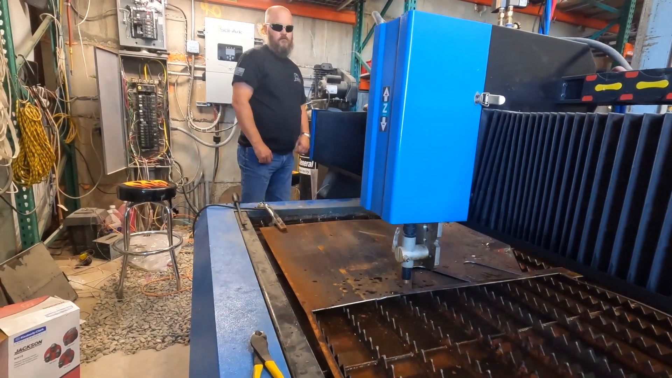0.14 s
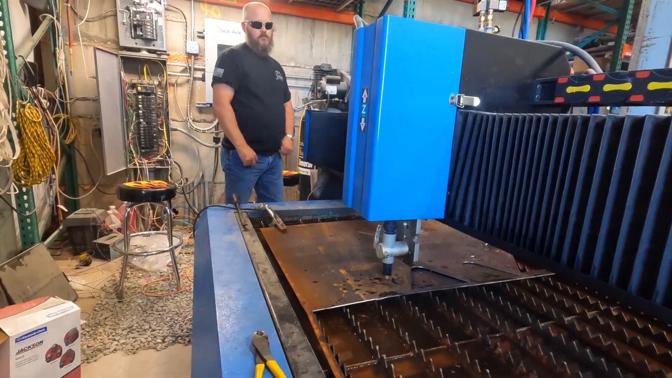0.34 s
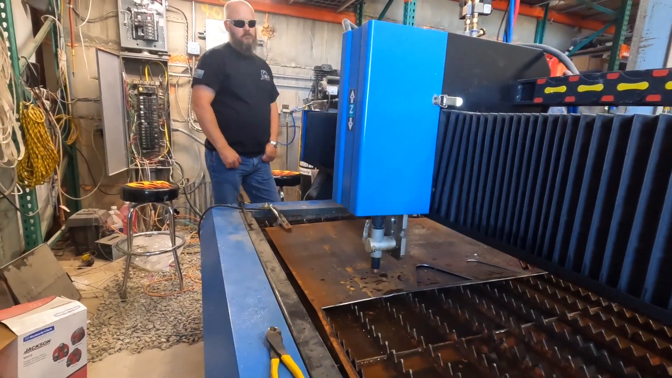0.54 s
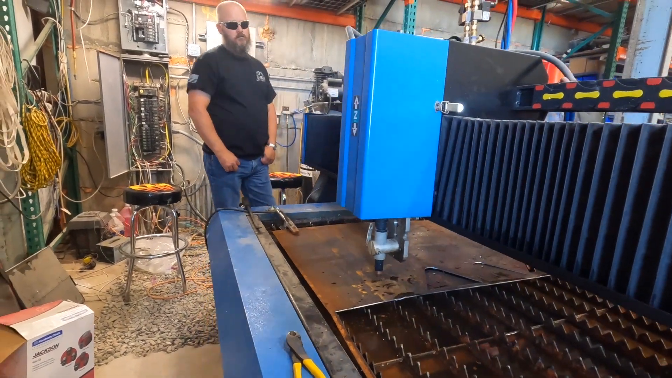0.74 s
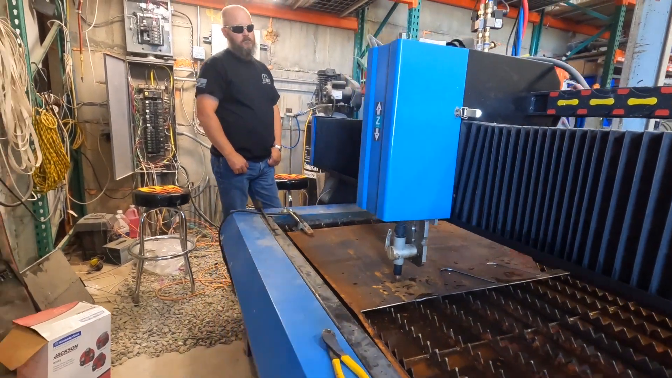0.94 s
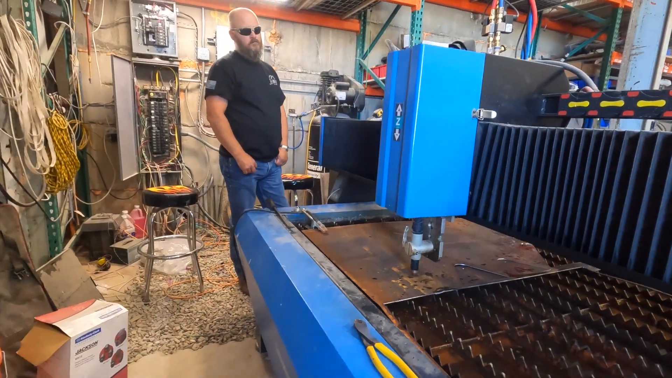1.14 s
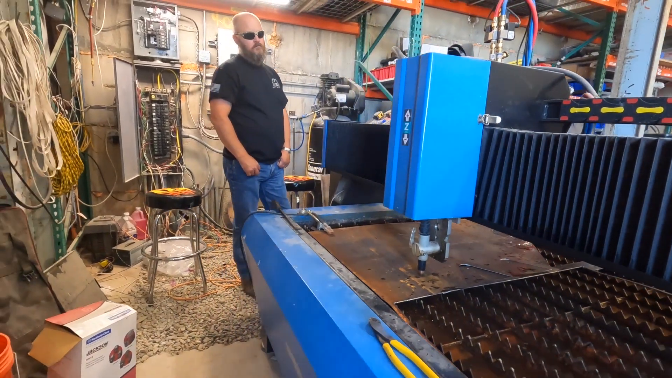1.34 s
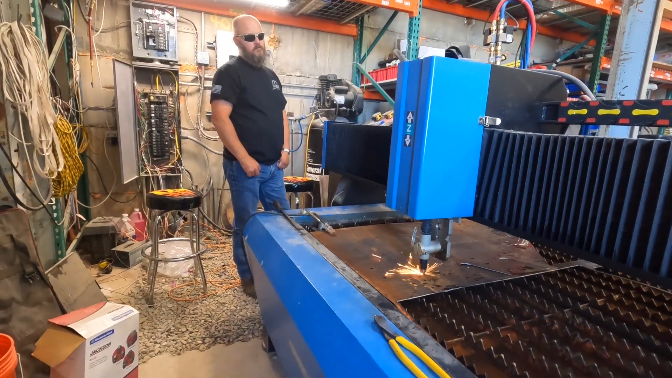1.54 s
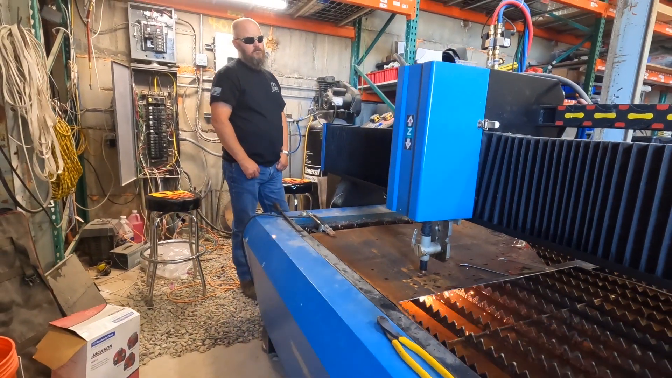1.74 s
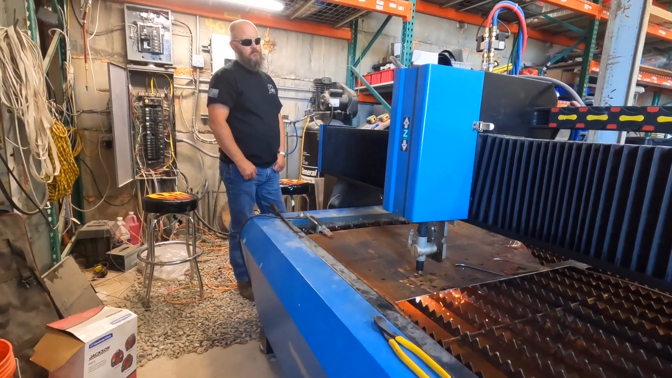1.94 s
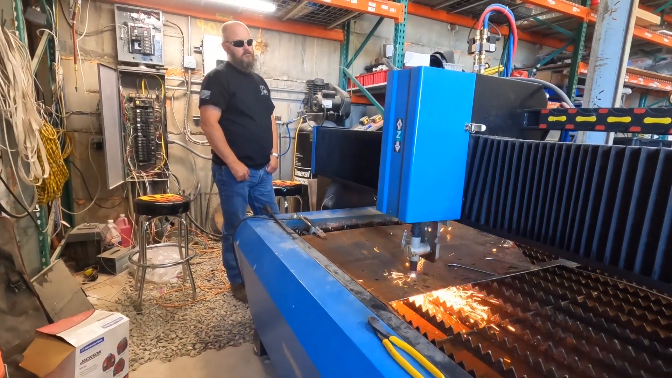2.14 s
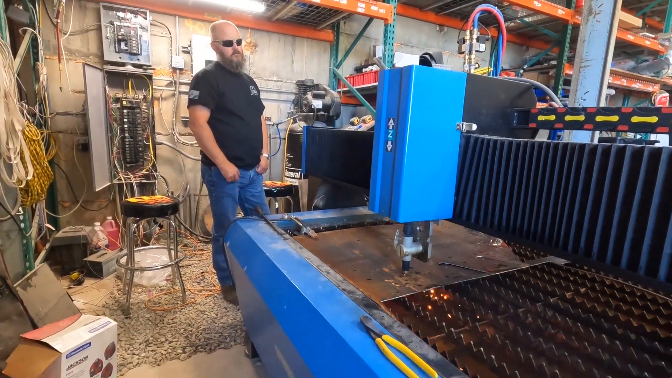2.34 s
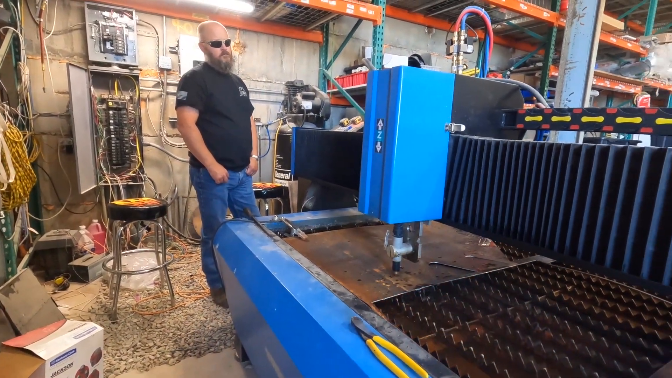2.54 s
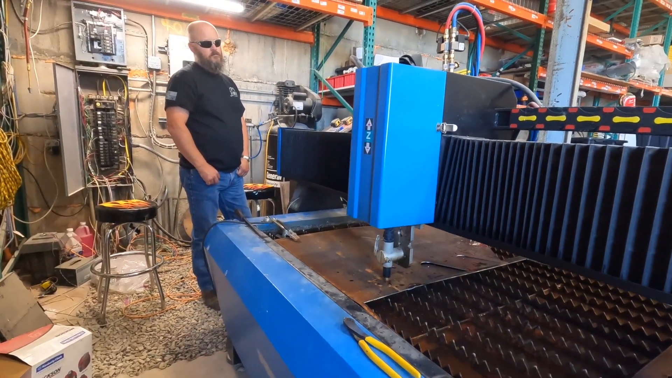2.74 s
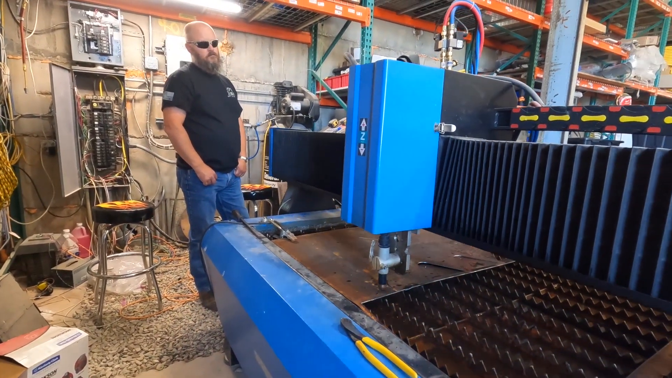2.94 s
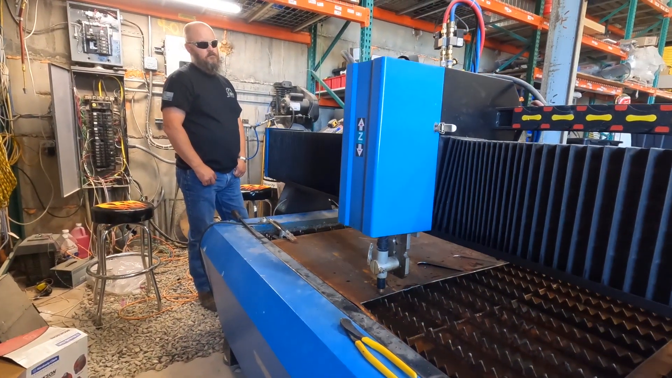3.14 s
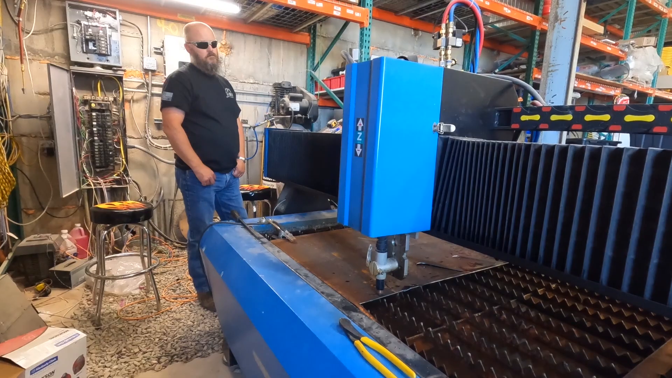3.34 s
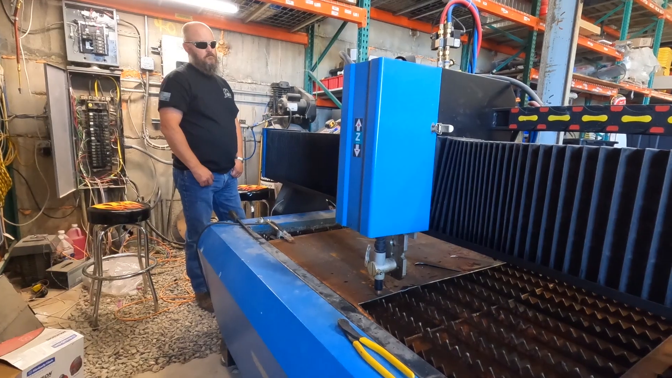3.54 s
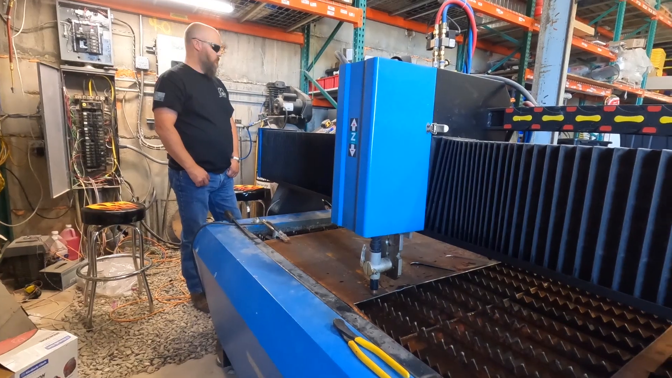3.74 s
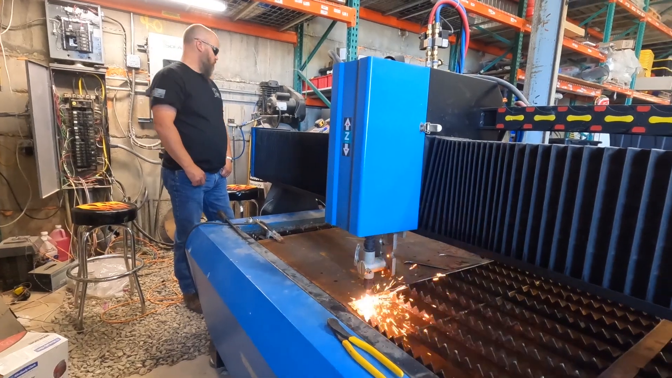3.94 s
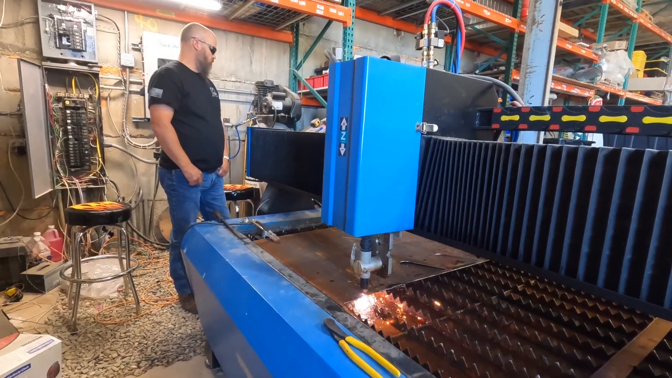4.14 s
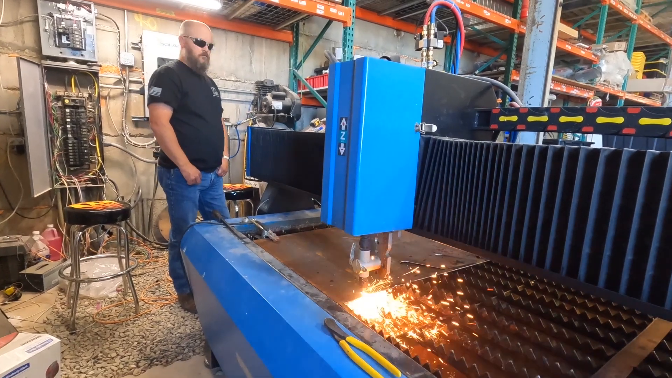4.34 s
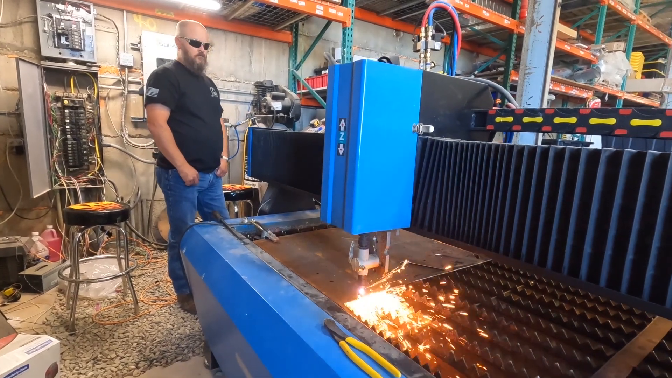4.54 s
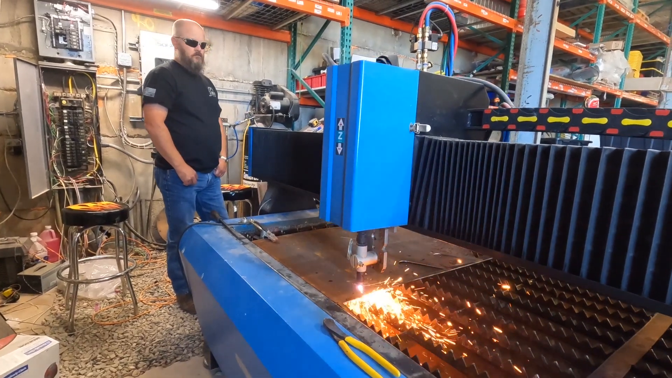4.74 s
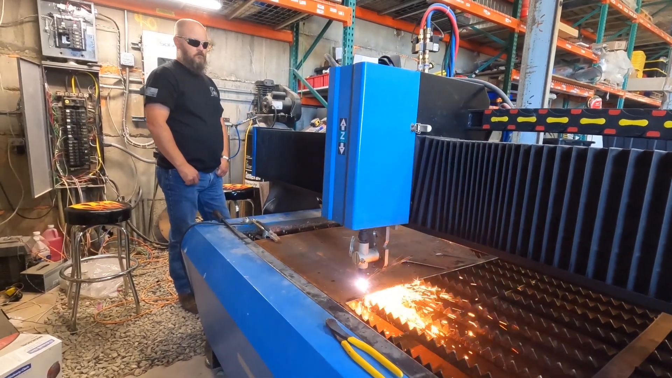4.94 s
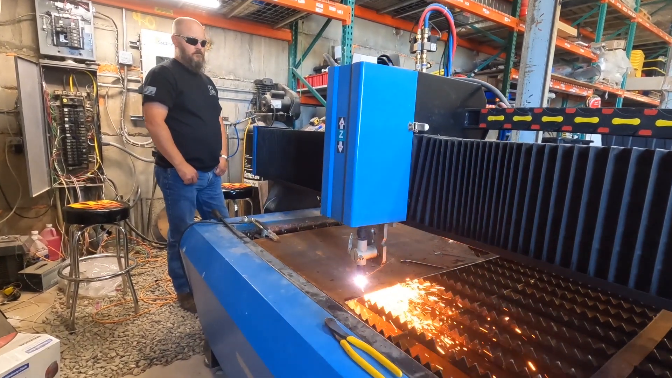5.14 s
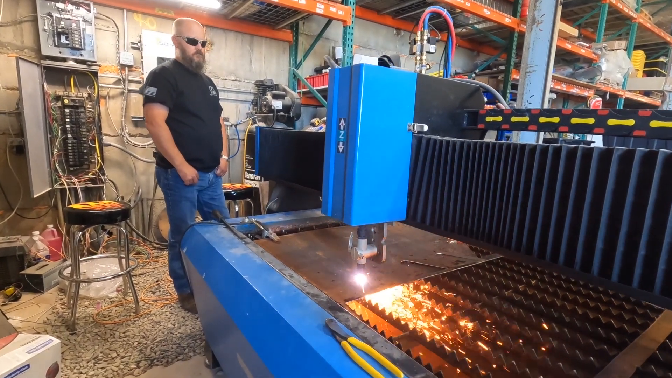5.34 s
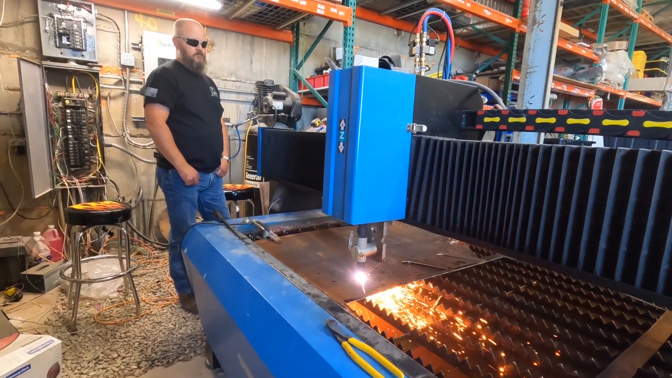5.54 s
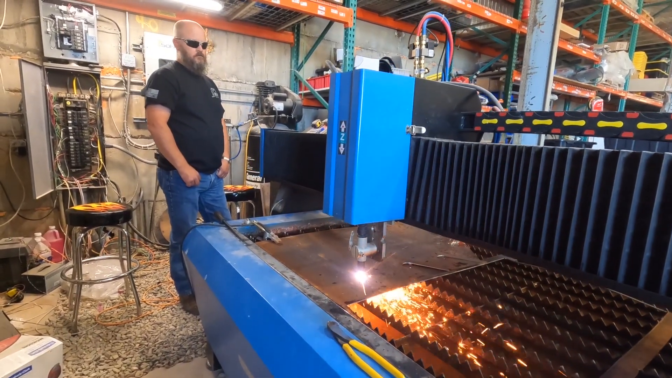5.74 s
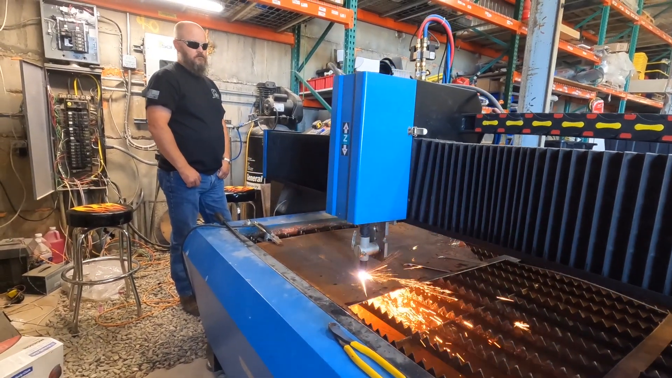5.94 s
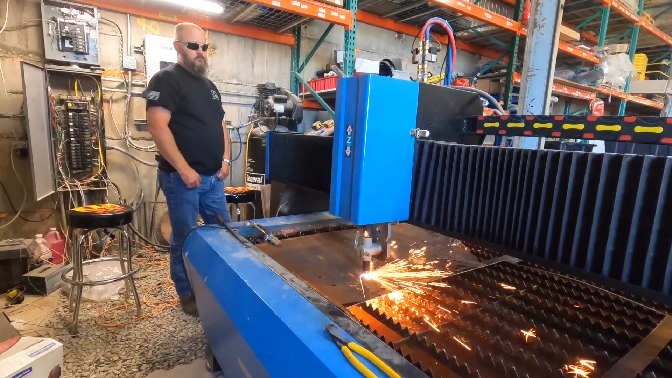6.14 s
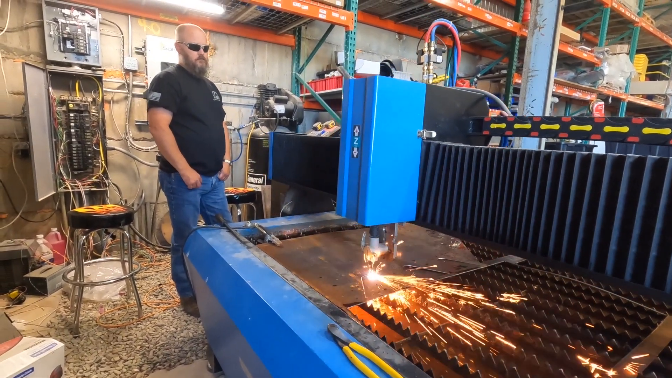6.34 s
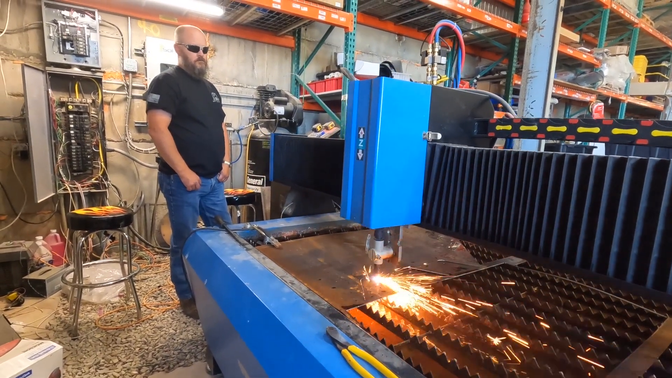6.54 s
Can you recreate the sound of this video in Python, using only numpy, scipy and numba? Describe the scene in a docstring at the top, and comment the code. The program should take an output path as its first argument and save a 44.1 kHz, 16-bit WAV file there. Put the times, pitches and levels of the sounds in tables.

```python
"""Plasma torch on a steel plate

In a workshop, with the microphone close to the cutting table, a CNC plasma torch ends one cut, shuts
off, pierces the plate with a sputtering roar, blows freely through the hole, shuts off again, relights
and runs along a new cut. The air jet hisses, the slot sings in gliding resonances, fans hum behind."""
import sys
import numpy as np
from scipy import signal
from scipy.fft import rfft, irfft, next_fast_len
from scipy.io import wavfile
from scipy.ndimage import uniform_filter1d, map_coordinates
from numba import njit

SR = 44100
rng = np.random.default_rng(int(sys.argv[2]) if len(sys.argv) > 2 else 0)


def wav_record(signal):
    """Record a signal, one row per channel, as 16-bit PCM in the file named by sys.argv[1]."""
    frames = np.transpose(np.atleast_2d(signal))
    bounded = np.clip(frames, -1, 1)
    # unit amplitude maps onto the largest positive 16-bit level
    quanta = np.round(bounded * 32767).astype(np.int16)
    wavfile.write(sys.argv[1], SR, quanta)


N = 290619
TIME, BINS = np.arange(N) / SR, np.fft.rfftfreq(N, 1 / SR)

# blasts from the air valve: (full flow at [s], stays open [s], relative level [dB], bleed-off time [s])
AIR_BLASTS = [(0, 1.239, -51, 0.37), (1.572, 1.982, -33.5, .19), (3.909, 2.68, -31.5, 0.21)]
VALVE_OPEN_S = 0.047
# stages of the work: (start [s], end [s])
FIRST_ARC, PIERCE_ARC, SECOND_ARC = (0, 1.22), (1.602, 2.308), (3.935, 6.6)
BREAKTHROUGH = (4.14, 4.35)   # the second cut's arc goes through the plate


def air_jet():
    """Compressed air and arc leave the nozzle as a wide, slightly crackling hiss, thin at first."""
    # spectrum of the free jet: (frequency [Hz], relative level [dB])
    jet_spectrum = [(200, -23.5), (400, -21), (750, -14.5), (1200, -2), (2600, -2), (3400, 3.5), (5000, 5),
                    (7300, -1.5), (8100, -8), (8800, -18), (9800, -8.5), (11400, -2.5), (12500, -9.5),
                    (13500, -25.5)]
    body_hz, body_lag_s = 1500, 0.027   # the low body builds up after the treble
    eddies = turbulence(1, 74) + 0.17 * spatter(2500, 4.4)
    hiss = from_db(-3) * colour(eddies, jet_spectrum, band_hz=(9500, 13000))
    body = irfft(rfft(hiss) / (1 + (BINS / body_hz) ** 5), N)
    flow = air_flow()
    body_flow = np.minimum(flow, np.interp(TIME - body_lag_s, TIME, flow))
    return flow * (hiss - body) + body_flow * body


def air_flow():
    """Each blast surges and settles; the jet chokes after the pierce and weakens when it splashes."""
    surge_db, surge_s = 2, 0.06
    choke_at_s, choke_db, recovery_s = 2.318, 12.5, 0.044
    flow = 0
    for start, length, level_db, bleed_s in AIR_BLASTS:
        surge = from_db(surge_db * np.exp(-np.abs(TIME - start) / surge_s))
        flow += surge * held(start, start + length, level_db, attack_s=VALVE_OPEN_S, release_s=bleed_s)
    choked_db = choke_db * (TIME > choke_at_s) / (1 + np.abs(TIME - choke_at_s) / recovery_s)
    return flow * from_db(-choked_db - 3.5 * splashing())


def steel_hiss():
    """The jet tears at the edge of the steel, most roughly while it pierces."""
    # spectra of the hiss on the steel, stage by stage: (frequency [Hz], relative level [dB])
    first_spectrum = [(200, -17), (450, -11.5), (900, -4), (1400, -6), (1900, 0.5), (2900, 5.5), (4400, 3),
                      (5200, -5), (6800, -0.5), (8200, -16.5)]
    pierce_spectrum = [(700, -18), (1300, -5), (1900, 3.5), (2500, 8.5), (3200, 2), (4300, -5), (5200, -4),
                       (6500, -30), (8500, -20)]
    second_spectrum = [(700, -7.5), (1300, -12), (1750, -1.5), (2100, 1.5), (2600, 0), (3300, 4.5),
                       (4400, -17), (5100, -3.5), (6100, -18), (7200, -6), (8500, -63)]
    band_hz = (1500, 3500)
    rush = turbulence(2.1, 42)
    first = held(*FIRST_ARC, -38.5, sag_db_per_s=-1.5) * colour(rush, first_spectrum, band_hz)
    rasp = turbulence(2.5, 60) + 0.25 * spatter(500, 15)
    pierce = from_db(-24) * piercing() * colour(rasp, pierce_spectrum, band_hz)
    sizzle = turbulence(2.4, 110) + 0.3 * spatter(1200, 22)
    second = biting() * colour(sizzle, second_spectrum, band_hz)
    return first + pierce + second


def piercing():
    """The piercing arc weakens as the hole opens, then stretches, flares and is blown out."""
    flare_db, flare_s = 5.5, 0.052
    flare = from_db(flare_db * np.exp(-np.abs(TIME - PIERCE_ARC[1]) / flare_s))
    return flare * held(*PIERCE_ARC, sag_db_per_s=4, release_s=0.065)


def biting():
    """The second cut's arc snaps on, is loudest breaking through, and loses bite as the jet splashes."""
    arc = held(*SECOND_ARC, -29, attack_s=0.016) + held(*BREAKTHROUGH, -34.5)
    return arc * from_db(-9 * splashing())


def slot_whistles():
    """Air across the slot excites resonances that glide with its shape and waver with the molten edge."""
    # resonances of the slot, each a straight glide: (start [s], length [s], start pitch [Hz],
    # end pitch [Hz], width [Hz], level [dB], sag [dB/s])
    glides = [ (0, 0.23, 2550, 2430, 600, -29.5, 16), (0, 0.33, 3420, 3840, 760, -23, 28),
              (0, 0.22, 4570, 4670, 640, -27, 24), (0, 0.29, 5600, 5500, 536, -27.5, 5),
              (0.297, 0.15, 3800, 3950, 600, -28.5, 3), (0.473, 0.35, 4240, 4100, 690, -29, 6),
              (0.322, 0.12, 5800, 5700, 380, -27.5, 5), (0.446, 0.44, 2450, 3200, 500, -33, 14),
              (0.45, 0.29, 2170, 2260, 260, -36, 11), (0.53, 0.042, 6340, 6200, 240, -35.5, 0),
              (0.504, 0.4, 5900, 5650, 380, -36, 9), (0.891, 0.078, 5540, 5560, 260, -31, 5),
              (0.997, 0.19, 5570, 5000, 200, -36, 8), (0.96, 0.24, 4490, 4450, 205, -28, 2),
              (1.64, 0.32, 2220, 1900, 640, -25.5, -10), (2.028, 0.05, 2750, 2870, 290, -22.5, 3),
              (2.03, 0.04, 5240, 5230, 400, -28, 0), (2.11, 0.031, 2660, 2550, 330, -26.5, -4),
              (2.17, 0.092, 4900, 5100, 1190, -28, 11), (2.264, 0.034, 2440, 3000, 1100, -21.5, 0),
              (2.435, 0.1, 1130, 1140, 380, -28.5, 30), (2.38, 1.11, 2450, 2630, 820, -31, 0),
              (2.67, 0.23, 6140, 6160, 980, -32, -16), (2.95, 0.81, 5520, 5740, 420, -30.5, 2),
              (3.956, 0.051, 3370, 3370, 376, -17.5, 10), (3.965, 0.5, 2340, 2240, 295, -25, 18),
              (4.033, 0.11, 4880, 4520, 380, -24, 10), (4.178, 0.04, 4900, 4700, 450, -24, 0),
              (4.342, 0.017, 4970, 4840, 550, -23, 3), (4.055, 0.48, 3420, 3630, 450, -26, 9.5),
              (4.566, 0.29, 4970, 5250, 500, -27, 13), (4.86, 1.02, 3510, 3470, 330, -24.5, -0.5),
              (4.912, 0.62, 2530, 2830, 402, -27.5, 4), (5.1, 0.69, 5060, 5240, 380, -32.5, -3),
              (5.452, 0.38, 4040, 4100, 230, -30, 1), (5.927, 0.15, 4040, 4840, 650, -33, -20),
              (5.973, 0.054, 3500, 3800, 450, -31, 5), (6.123, 0.14, 4570, 5200, 500, -33, 0),
              (6.172, 0.073, 6800, 6600, 600, -32.5, 0), (6.042, 0.57, 2340, 2480, 380, -29, -0.5), ]
    two_pass_narrowing = np.sqrt(np.sqrt(2) - 1)
    out = np.zeros(N)
    for start, length, start_hz, end_hz, width_hz, level_db, sag in glides:
        end, edge_s = start + length, 0.046 + 0.9 * length
        waver = 1 + 0.008 * drift(14)
        hz = np.interp(TIME, [start, end], [start_hz, end_hz]) * waver
        flicker = from_db(1.1 * drift(30))
        swell = held(start, end, level_db, sag, attack_s=edge_s, release_s=edge_s)
        out += swell * flicker * sing(hz, width_hz / two_pass_narrowing)
    # the whistles stop as soon as the pressure drops
    pressure = sum(held(start, start + length, attack_s=VALVE_OPEN_S, release_s=0.14)
                   for start, length, *_ in AIR_BLASTS)
    return pressure * out


def melt():
    """Liquid steel is blown away in lumps: a low, sputtering roar."""
    # spectra of the roar in the pierce and in the second cut: (frequency [Hz], relative level [dB])
    pierce_spectrum = [(60, -40), (130, -37), (220, -14.5), (350, -10.5), (500, -3), (720, -8.5), (850, 1),
                       (1000, -5), (1600, -2.5)]
    cut_spectrum = [(90, -33), (140, -43), (215, -16.5), (340, -16.5), (450, -4), (750, -4.5), (850, 2.5),
                    (1600, 1.5)]
    band_hz, melt_lag_s = (150, 1200), 0.03   # the steel melts a moment after the arc takes hold
    lumps = from_db(drift(5.5))
    molten = from_db(-32.5) * np.interp(TIME - melt_lag_s, TIME, piercing()) * lumps
    pierce = molten * colour(turbulence(2, 60), pierce_spectrum, band_hz)
    flowing = held(BREAKTHROUGH[0] + melt_lag_s, SECOND_ARC[1], -38)
    dribble = turbulence(3, 55) + 0.6 * spatter(350, 5)
    return pierce + flowing * colour(dribble, cut_spectrum, band_hz)


def arc_strikes():
    """Gas expands suddenly as the arc catches: a crack that dies within hundredths of a second."""
    # the arc catching on the plate: (time [s], level [dB], decay [s])
    strikes = [(3.931, -18, 0.0075), (4.122, -23.5, 0.014)]
    # spectrum of the crack: (frequency [Hz], relative level [dB])
    crack_spectrum = [(250, -9), (700, 2), (3000, 4), (7000, -2)]
    bursts = sum(from_db(level_db) * (TIME >= at_s) * np.exp(-np.abs(TIME - at_s) / decay_s)
                 for at_s, level_db, decay_s in strikes)
    cracks = bursts * colour(turbulence(0.67, 99), crack_spectrum)
    return signal.sosfilt(signal.butter(4, 280, "high", fs=SR, output="sos"), cracks)


def gas_puffs():
    """Gas and melt puff out under the plate in short, dull swells, each centred on one pitch."""
    # bell-shaped puffs: (peak time [s], pitch [Hz], level [dB], half-length [s])
    puffs = [(0.25, 181, -54, 0.019), (0.482, 206, -58, 0.059), (0.68, 223, -53, 0.034),
             (0.944, 1860, -34, 0.023), (1.643, 230, -40, 0.014), (1.668, 600, -35, 0.018),
             (1.779, 225, -40, .011), (1.846, 730, -32.5, 0.017), (1.874, 244, -37.5, 0.02),
             (1.94, 198, -43, 0.0079), (2.024, 235, -41, 0.011), (2.168, 504, -35, 0.0082),
             (2.2, 225, -44, .012), (2.316, 225, -32.5, 0.0098), (2.319, 700, -34, 0.0044),
             (2.396, 800, -26.5, .008), (3.093, 195, -50, 0.0093), (3.542, 320, -47.5, 0.0075),
             (6.007, 332, -41, 0.015), (6.368, 800, -35, 0.018), (6.45, 800, -35, 0.016)]
    out = np.zeros(N)
    for at_s, hz, level_db, half_s in puffs:
        swell = from_db(level_db) * np.exp(-0.5 * ((TIME - at_s) / half_s) ** 2)
        out += swell * sing(hz, width_hz=190 + 0.1 * hz)
    return signal.sosfilt(signal.butter(2, 130, "high", fs=SR, output="sos"), out)


def valve_leak():
    """As the valve opens and as it shuts, air squeezes through the gap with a thin hiss."""
    leak_s, gap = 0.031, 0
    for start, length, *_ in AIR_BLASTS:
        end = start + length
        gap += held(start - leak_s, start, -42.5, attack_s=0.025, release_s=VALVE_OPEN_S)
        gap += held(end, end + leak_s, -39, attack_s=VALVE_OPEN_S, release_s=0.36)
    return gap * sing(hz=4700, width_hz=2500)


def swirl(x):
    """Eddies of hot gas lift and sink patches of the spectrum, more so in the first cut and the splash."""
    patch_hz, patch_s = 300, 0.025
    hz, frame_s, frames = signal.stft(x, SR, nperseg=512)
    restless = np.interp(frame_s, TIME, splashing() + held(*FIRST_ARC))
    depth_db = 1.6 + 1.3 * restless
    grid = np.meshgrid(hz / patch_hz, frame_s / patch_s, indexing="ij")
    eddies = map_coordinates(rng.standard_normal((200, 600)), grid, mode="mirror")
    return signal.istft(frames * from_db(depth_db * eddies), SR)[1][:N]


def splash(x):
    """The hiss mixes with its duller reflection off the plate, whose path wobbles: a shifting comb."""
    delay_s = 0.000455 * (1 + 0.05 * drift(9))
    echo = map_coordinates(uniform_filter1d(x, size=3), [(TIME - delay_s) * SR], order=3)
    return x + 0.7 * splashing() * echo


def splashing():
    """How much of the jet splashes back off the plate instead of passing through the slot, 0-1."""
    # spans of full splash: (start [s], end [s])
    spans = [(6.2, 6.6)]
    fade_s = 0.23
    return sum(np.clip(1 + np.minimum(TIME - start, end - TIME) / fade_s, 0, 1) for start, end in spans)


def cutting_table(x):
    """The hollow table lifts some pitches and sinks others; near surfaces faintly ripple the spectrum."""
    # resonances of the hollow table: (frequency [Hz], width [Hz], boost [dB])
    table_modes = [(234, 22, 5.5), (537, 11, 1), (595, 11, 1.5), (666, 18, 4), (832, 29, 5.5),
                   (990, 50, -0.5), (1490, 31, 1), (1666, 39, -2.5), (1746, 61, 4.5), (2200, 330, -2.5),
                   (2460, 23, 1.5), (2720, 34, 1), (3830, 76, 1.5), (4770, 44, 2)]
    # hard surfaces close to the torch: (delay [s], share reflected [0-1])
    reflections = [(.00116, 0.005), (.0022, 0.007)]
    size = next_fast_len(N + SR)   # room for the ring to die away
    bins = np.fft.rfftfreq(size, 1 / SR)
    body = 1 + sum((from_db(boost_db) - 1) / (1 + 2j * (bins - hz) / width_hz)
                   for hz, width_hz, boost_db in table_modes)
    ripple = 1 + sum(share * np.exp(-2j * np.pi * bins * delay_s) for delay_s, share in reflections)
    return irfft(rfft(x, size) * body * ripple, size)[:N]


def workshop(x):
    """The room returns a diffuse tail, octave by octave; the top treble dies first."""
    # reverberation of the workshop: (frequency [Hz], time to fall 60 dB [s])
    decay_times = [(200, 0.25), (2000, 0.55), (5000, 0.4), (12000, 0.16)]
    t, tail = TIME[:SR], 0
    for top_hz in 125 * 2 ** np.arange(8):
        octave = signal.butter(2, [top_hz / 2, top_hz], "band", fs=SR, output="sos")
        decay = from_db(-60 * t / at_hz(decay_times, top_hz / np.sqrt(2)))
        tail += signal.sosfilt(octave, rng.standard_normal(SR)) * decay
    tail *= t > 0.005   # the tail reaches the microphone after the direct sound
    return signal.fftconvolve(x, tail / np.linalg.norm(tail))[:N]


def fans():
    """Steady fans and motors rush and hum; the background is turned down under the loud last cut."""
    # spectrum of the fans' rush: (frequency [Hz], relative level [dB])
    rush_spectrum = [(30, -45), (100, -6), (160, 0), (350, -1), (1000, -5.5), (1400, -11), (3200, -4),
                     (5000, -23), (12000, -53)]
    # level the background is set to: (time [s], level [dB])
    background_levels = [(0, -62), (3.8, -60), (4.1, -62.5), (6.59, -72)]
    # motor tones with the background fully up: (frequency [Hz], level [dB])
    motor_tones = [(83.5, -89), (166.9, -66), (1550, -80), (3219, -72)]
    background_db = np.interp(TIME, *np.transpose(background_levels))
    rush = from_db(background_db) * colour(rng.standard_normal(N), rush_spectrum)
    hum = sum(from_db(level_db) * np.sqrt(2) * np.sin(2 * np.pi * hz * TIME + 0.32 * drift(3.9))
              for hz, level_db in motor_tones)
    return rush + hum * from_db(background_db - background_db.max())


def turbulence(flutter_db, per_s):
    """White noise whose strength flutters as eddies pass."""
    return rms_one(rng.standard_normal(N) * from_db(flutter_db * drift(per_s)))


def spatter(per_s, spread_db):
    """Random snaps of bursting droplets, some larger than the rest."""
    sizes = from_db(spread_db * np.minimum(rng.exponential(1, N), 2))
    return rms_one((rng.random(N) < per_s / SR) * sizes * rng.choice([-1, 1], N))


def sing(hz, width_hz):
    """Turbulence twice through one resonance; rms 1."""
    pole = np.exp(np.pi * (2j * hz - width_hz) / SR) * np.ones(N)
    return rms_one(resonate(resonate(turbulence(0.8, 60), pole), pole))


@njit
def resonate(x, pole):
    """Two-pole resonance whose pole may move from sample to sample; it passes no bass."""
    out, state = np.zeros(len(x)), 0j
    for i in range(1, len(x)):
        state = state * pole[i] + x[i] - x[i - 1]
        out[i] = state.imag
    return out


def colour(x, spectrum, band_hz=(0, SR)):
    """Shape x by a spectrum that falls away beyond its ends; rms 1 within the band."""
    skirts = np.minimum(BINS / spectrum[0][0], 1) ** 3 / np.maximum(BINS / spectrum[-1][0], 1) ** 6
    shaped = rfft(x) * from_db(at_hz(spectrum, BINS)) * skirts
    in_band = (BINS > band_hz[0]) & (BINS < band_hz[1])
    return irfft(shaped, N) / np.std(irfft(shaped * in_band, N))


def held(start, end, level_db=0, sag_db_per_s=0, attack_s=0.11, release_s=0.2):
    """Gain that rises 60 dB in the attack before start, sags until end, and falls 60 dB in the release."""
    outside = np.maximum(start - TIME, 0) / attack_s + np.maximum(TIME - end, 0) / release_s
    held_s = np.clip(TIME, start, end) - start
    return from_db(level_db - sag_db_per_s * held_s - 60 * outside)


def drift(per_s):
    """Smooth random wander of rms 1 that changes about per_s times a second."""
    step, settle = 40, 2000   # samples per step, steps for the filter to settle
    pole = np.exp(-2 * np.pi * per_s * step / SR)
    kicks = rng.standard_normal(N // step + settle + 2)
    slow = signal.lfilter([1], [1, -2 * pole, pole * pole], kicks)[settle:]
    return np.interp(np.arange(N) / step, np.arange(len(slow)), rms_one(slow))


def at_hz(points, hz):
    """Read a table on a log-frequency axis."""
    known_hz, values = np.transpose(points)
    return np.interp(np.log(np.maximum(hz, 1)), np.log(known_hz), values)


def from_db(db):
    return 10 ** (np.asarray(db) / 20)


def rms_one(x):
    return x / np.sqrt(np.mean(x ** 2) + 1e-20)


def scene():
    """The torch close up and centred, the room and the fans behind; only the top treble is wide."""
    # stereo width of the room: (frequency [Hz], side relative to mid [dB])
    stereo_width = [(100, -31), (500, -22), (1500, -63), (7000, -86), (9500, -63), (11000, -12.5),
                    (12500, -3)]
    # the hiss dips briefly just before the breakthrough
    falter = 1 - 0.41 * held(4.097, 4.12, attack_s=0.038, release_s=0.038)
    hiss = falter * splash(swirl(air_jet() + steel_hiss()))
    torch = cutting_table(hiss + melt() + valve_leak() + gas_puffs() + arc_strikes())
    whistles = cutting_table(slot_whistles())
    room = from_db(-14.5) * workshop(torch + from_db(-13) * whistles)
    mid = torch + whistles + room + fans()
    side = irfft(rfft(workshop(mid)) * from_db(at_hz(stereo_width, BINS)), N)
    return np.array([mid + side, mid - side])


def record(dry):
    """The microphone has one narrow notch in the treble; the top is cut."""
    notch_hz, cutoff_hz = 9050, 13400
    notched = signal.lfilter(*signal.iirnotch(notch_hz, Q=32, fs=SR), dry)
    return signal.sosfilt(signal.ellip(10, 0.1, 80, cutoff_hz, fs=SR, output="sos"), notched)


dry = scene()
out = record(dry)
wav_record(out)
```